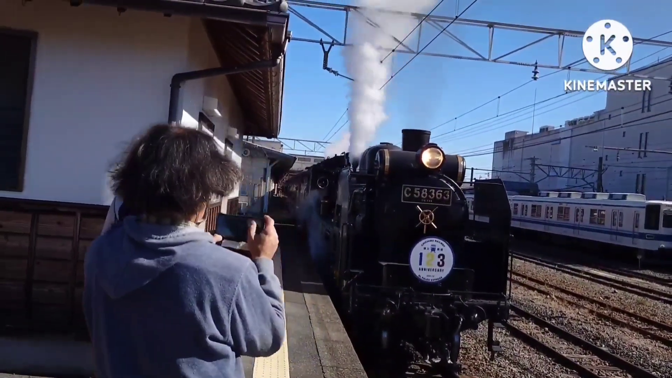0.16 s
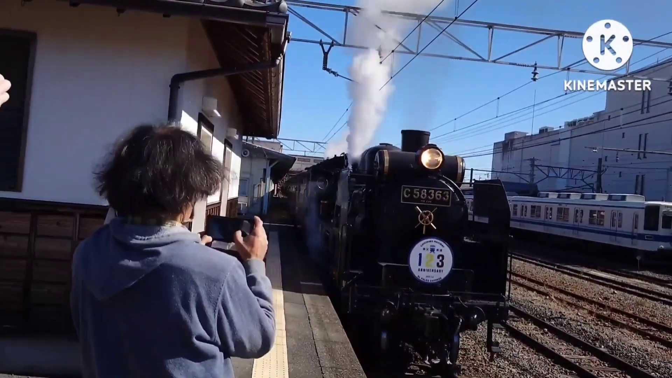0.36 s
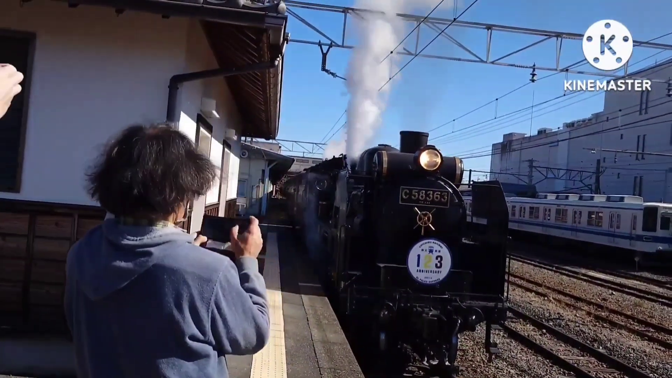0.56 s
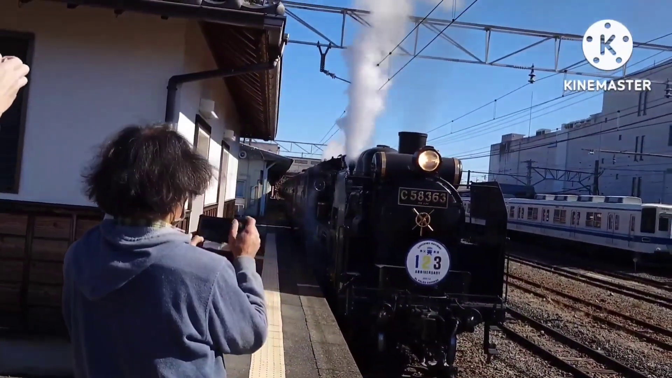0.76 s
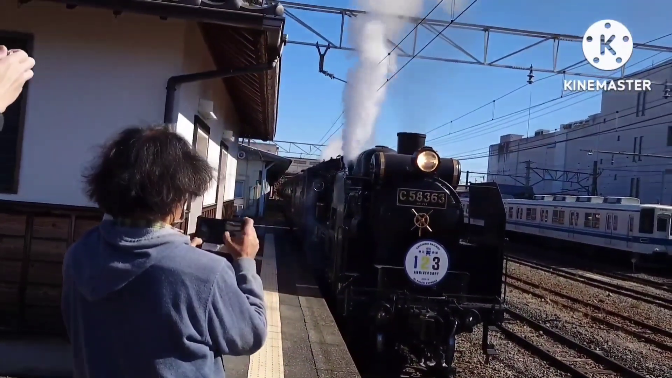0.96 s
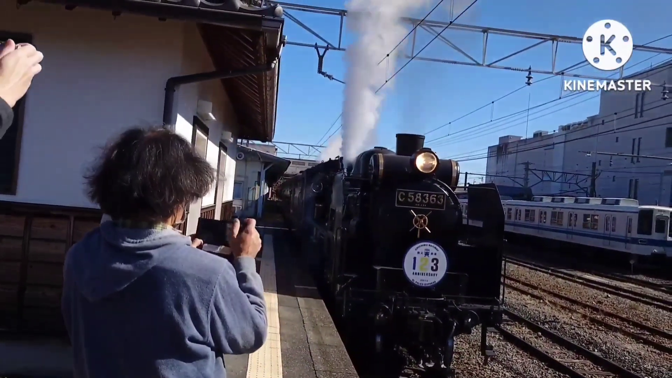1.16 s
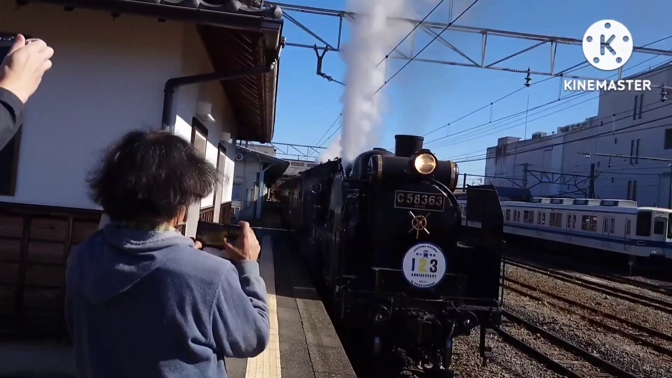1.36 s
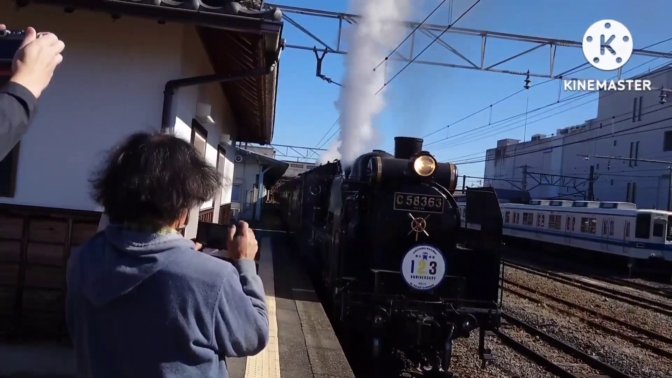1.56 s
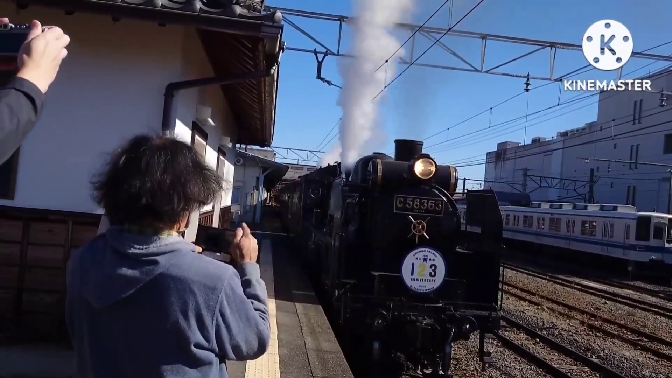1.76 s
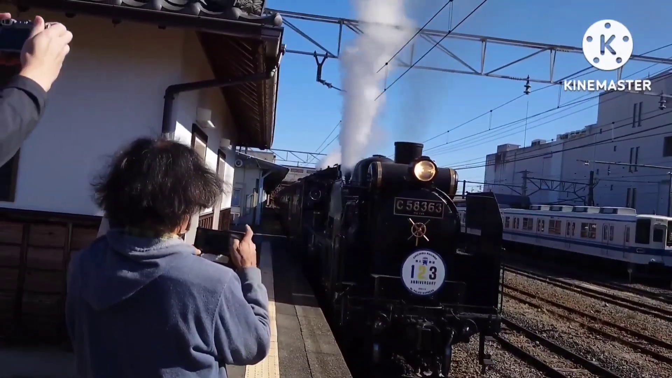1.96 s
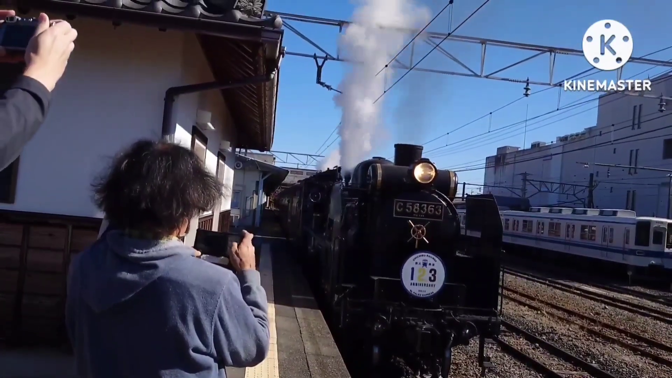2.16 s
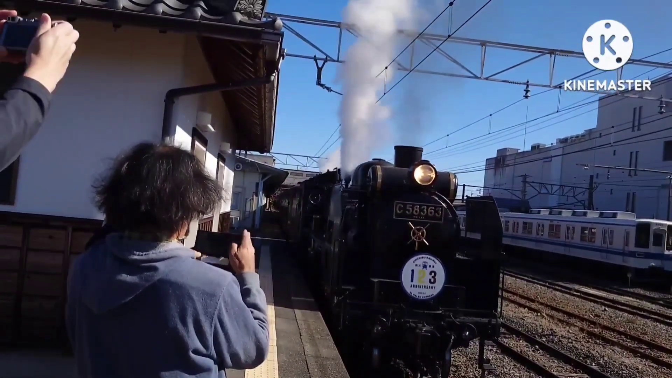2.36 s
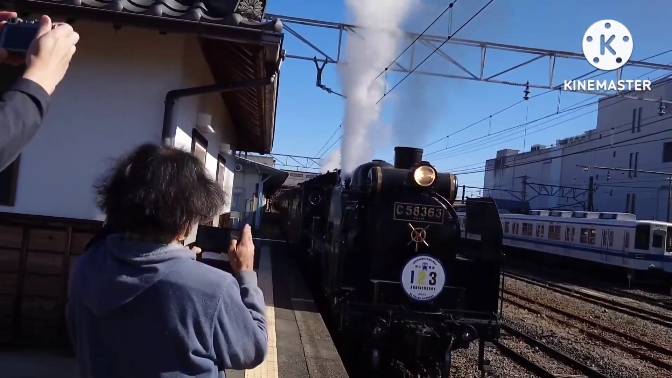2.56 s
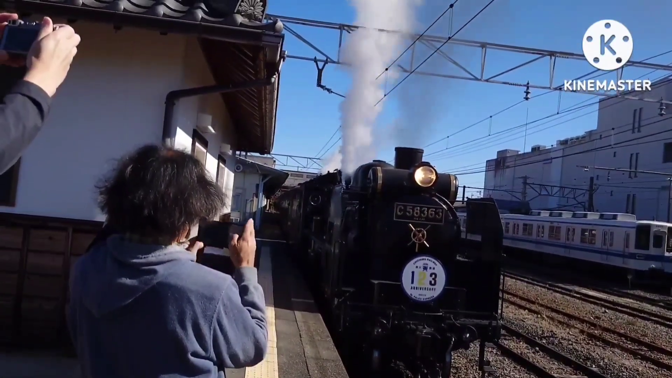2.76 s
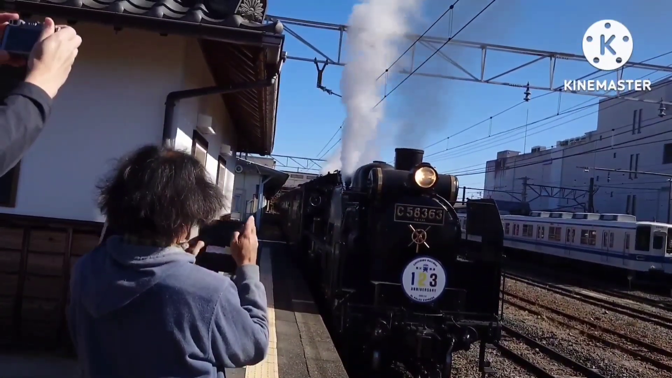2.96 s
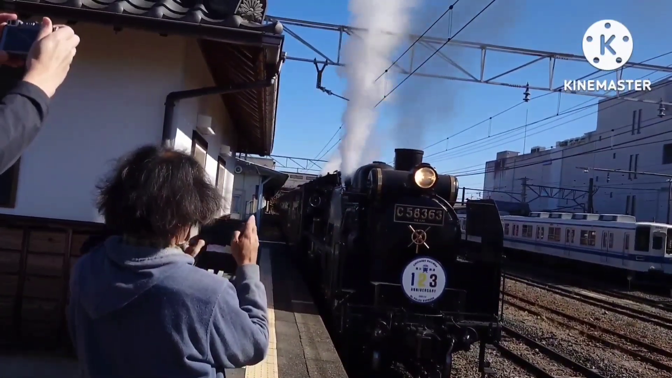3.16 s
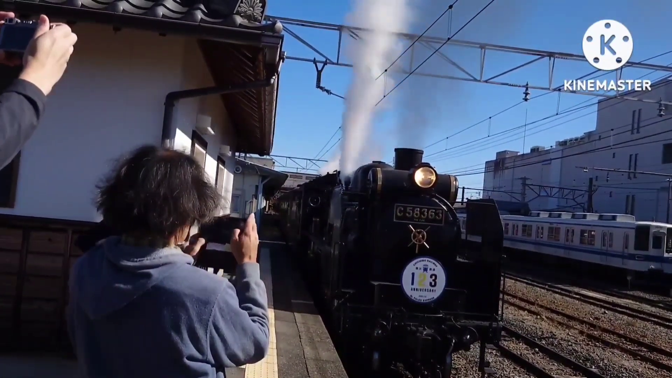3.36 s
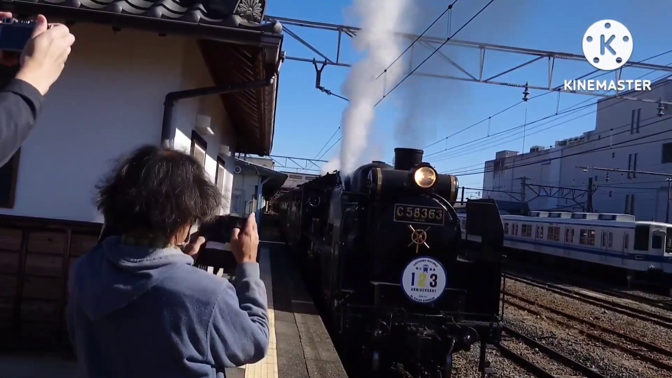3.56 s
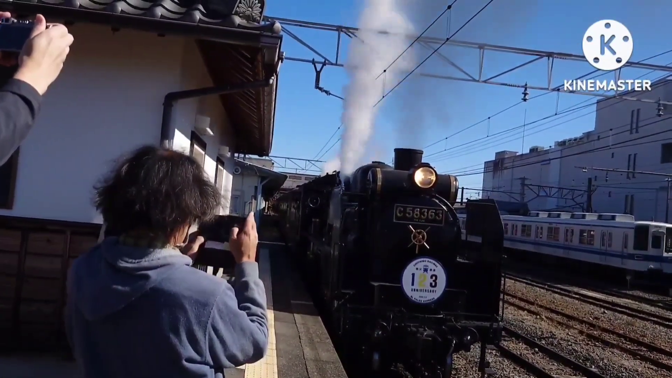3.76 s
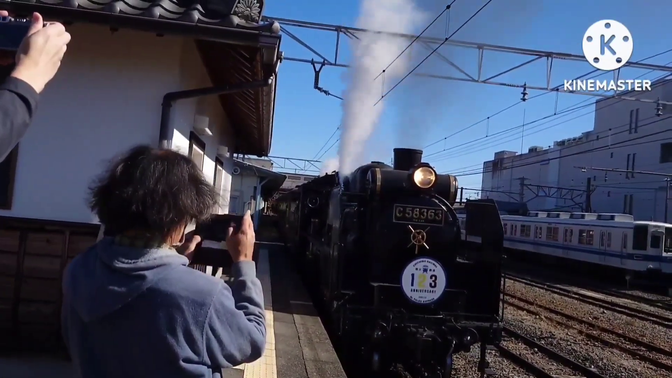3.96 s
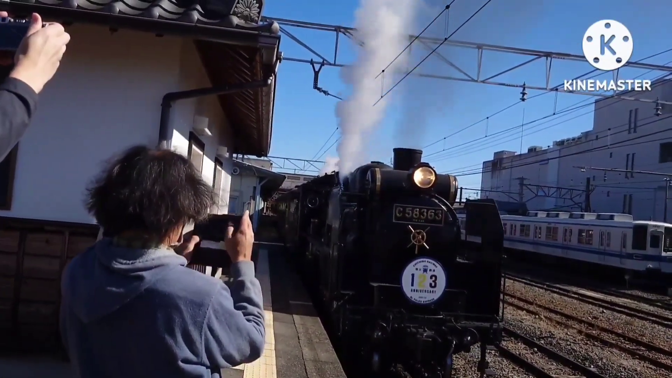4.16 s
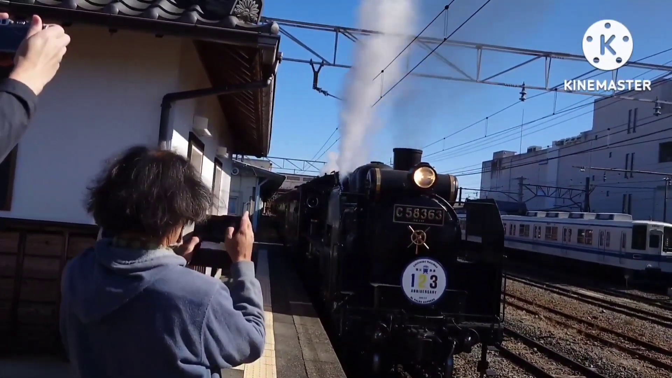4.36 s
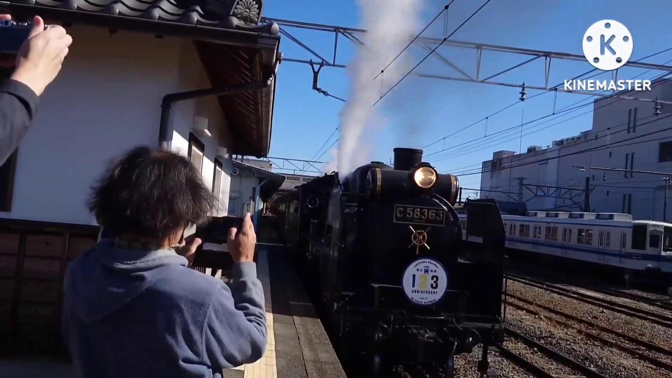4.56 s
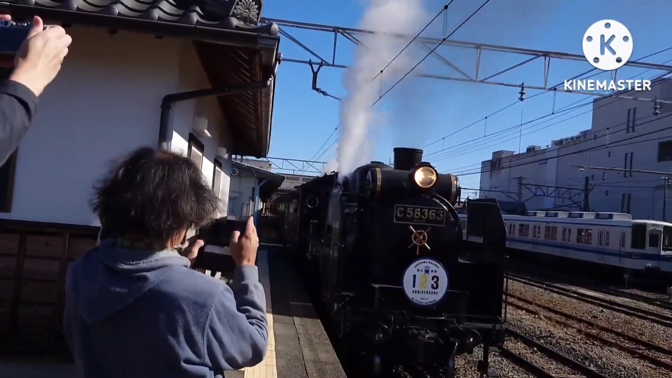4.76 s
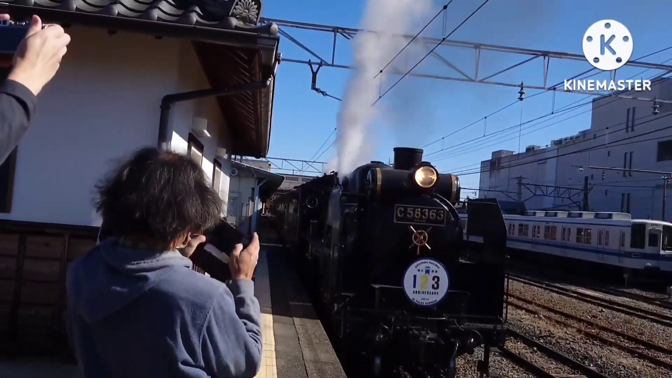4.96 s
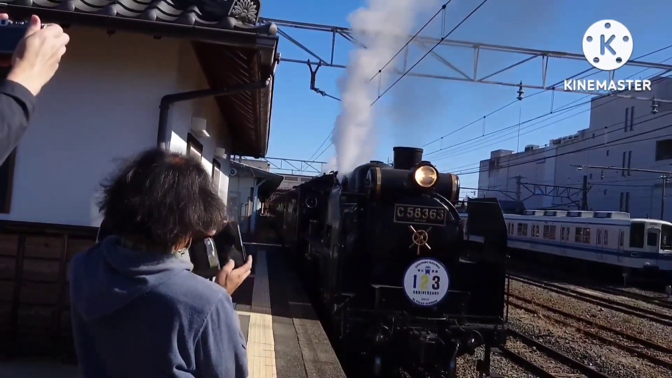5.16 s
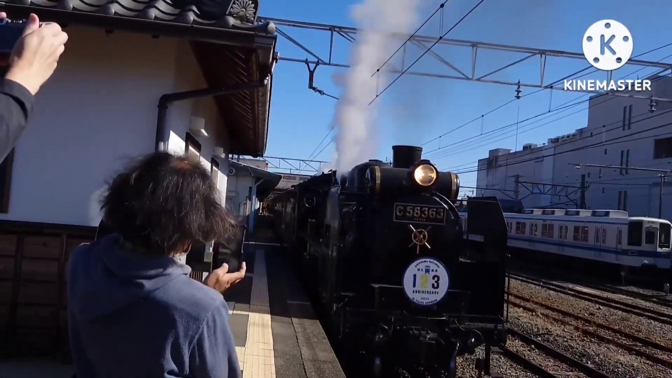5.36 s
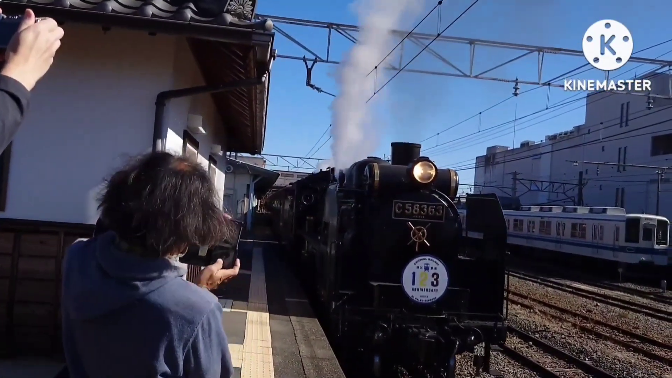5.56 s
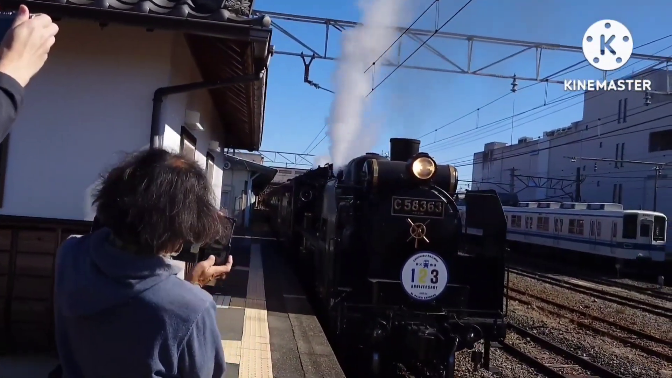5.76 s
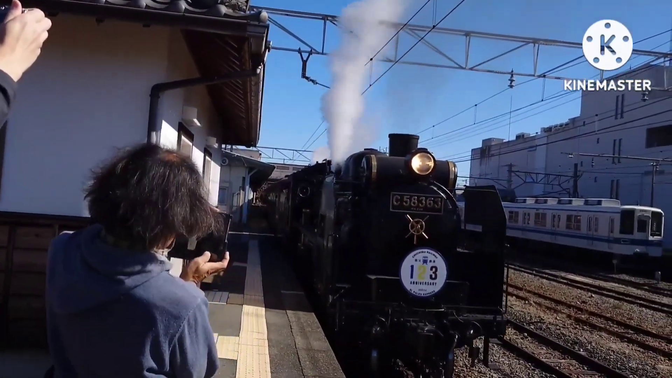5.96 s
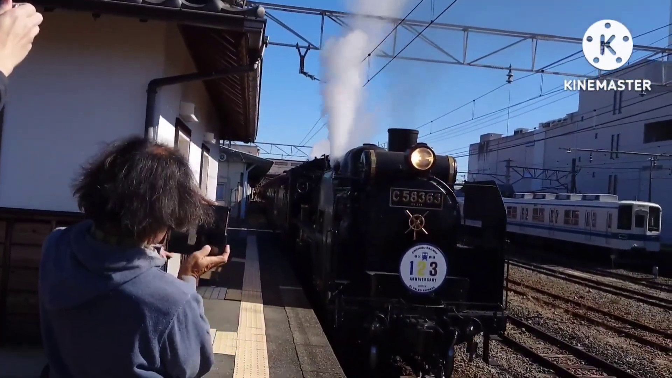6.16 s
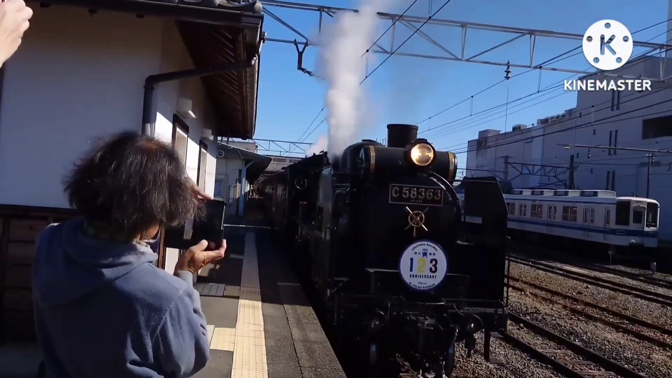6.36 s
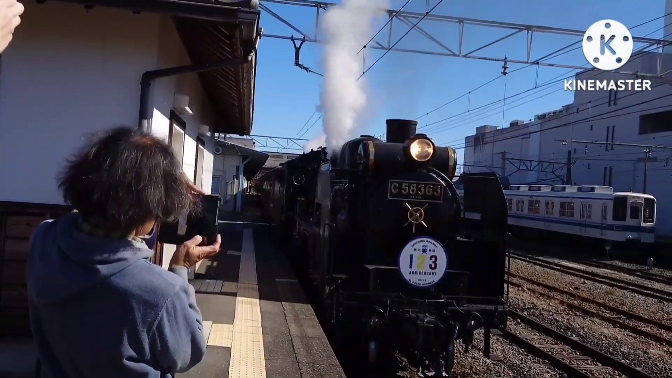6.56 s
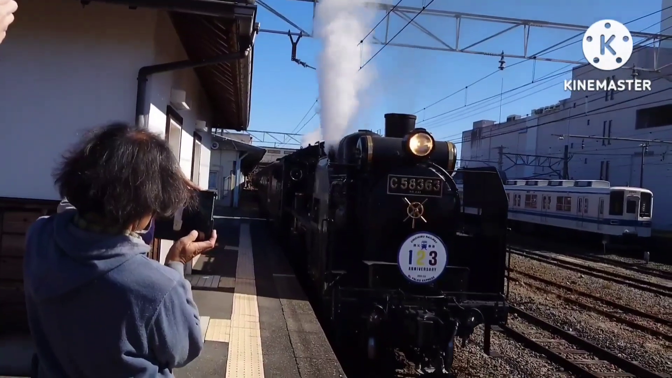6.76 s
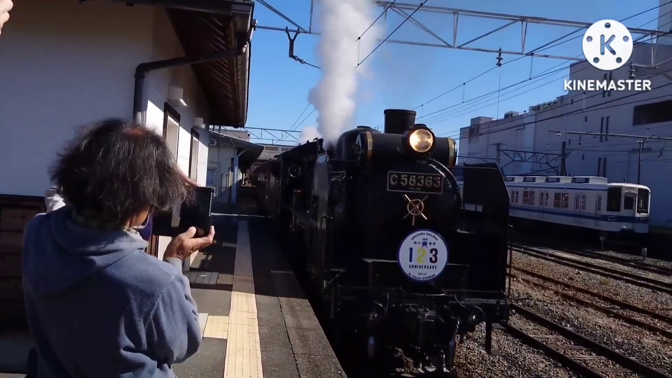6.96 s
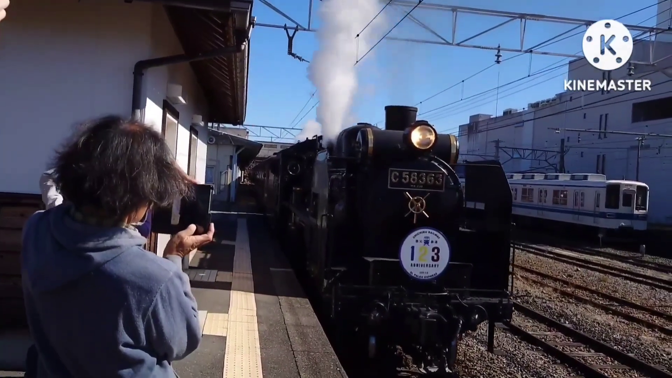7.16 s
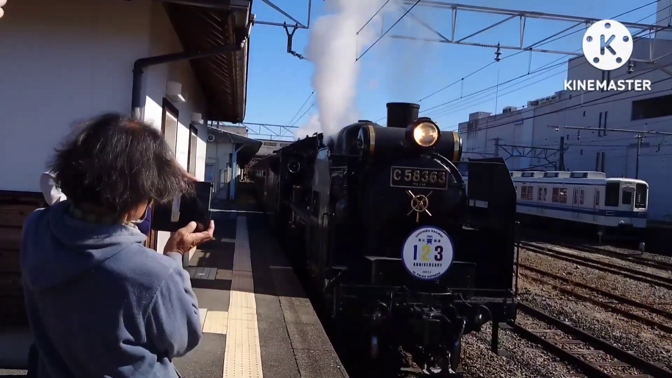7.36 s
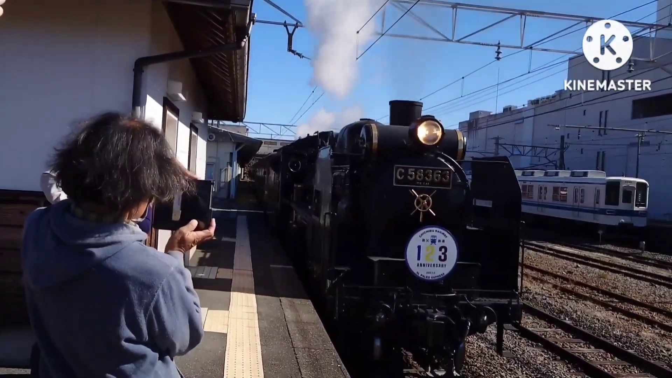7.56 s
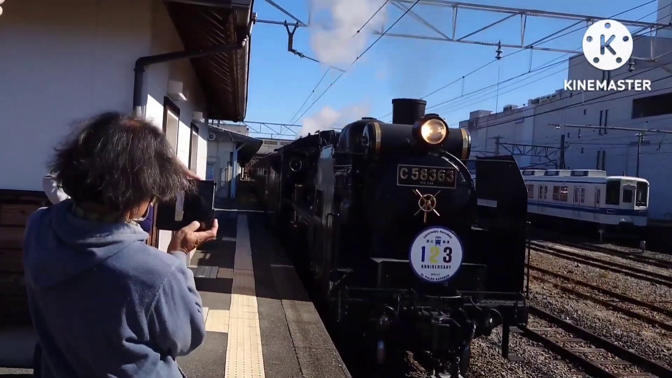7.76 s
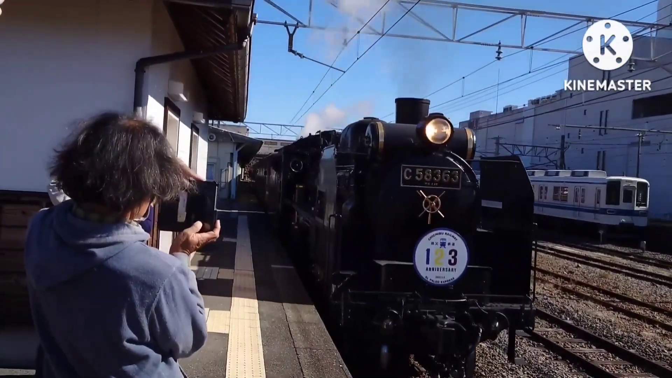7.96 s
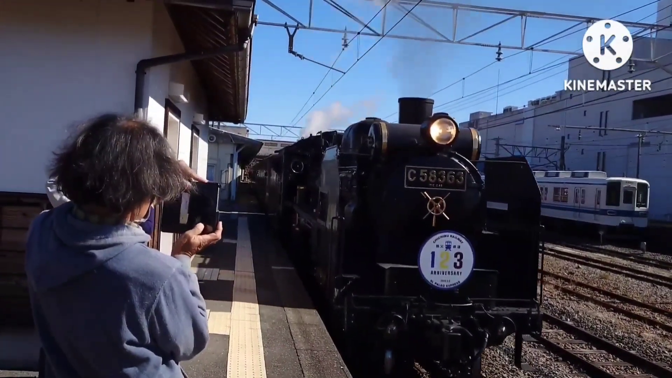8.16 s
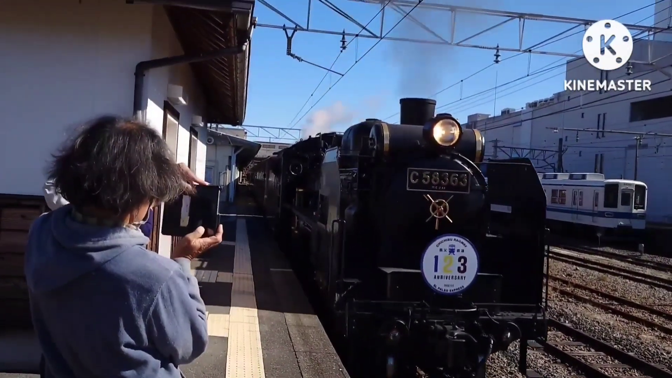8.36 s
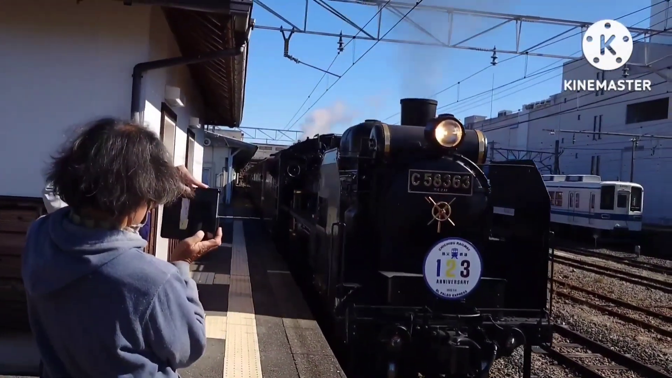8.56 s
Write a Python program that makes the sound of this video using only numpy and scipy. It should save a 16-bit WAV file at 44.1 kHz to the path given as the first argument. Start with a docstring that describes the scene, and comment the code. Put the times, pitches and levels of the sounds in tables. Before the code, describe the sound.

Long multi-toned steam train whistle blast, harsh and breathy, heard close from a platform, ending abruptly with fading echoes and soft steam hiss.

```python
"""Steam whistle at a station

A standing steam locomotive holds one long blast on its five-chime whistle, heard from the platform.
Five jittering tones with harmonics sharpen as the pipes warm, and beat inside the coloured noise of the jet.
When the valve shuts, the chord echoes round the station through slaps and a fading ring.
Shaped noise makes the leaking steam, the boiler rumble and the gusts of wind near the end."""
import sys
import numpy as np
from scipy import signal
from scipy.fft import irfft
from scipy.io import wavfile
from scipy.ndimage import uniform_filter1d, map_coordinates

SR = 44100
rng = np.random.default_rng(int(sys.argv[2]) if len(sys.argv) > 2 else 0)


def unload_wav(signal):
    """Save mono or channel-first audio to the path in sys.argv[1] as 16-bit WAV at rate SR, clipped to [-1, 1]."""
    wavfile.write(
        sys.argv[1],
        SR,
        np.round(np.clip(np.atleast_2d(signal).T, -1, 1) * 32767).astype(np.int16),
    )


N = 379701
TIME = np.arange(N) / SR   # seconds
FREQS = np.maximum(np.fft.rfftfreq(N, 1 / SR), 1)   # Hz
APART = np.array([[.5], [-.5]])   # shares a left-right difference between the two channels


def from_db(db):
    """Turn decibels into gain."""
    return 10 ** (np.asarray(db) / 20)


def rms_one(x):
    """Scale to an average (rms) strength of 1."""
    return x / np.sqrt(np.mean(np.abs(x) ** 2) + 1e-20)


def in_time(rows):
    """Read a table of (time, value) at every sample, with straight lines between its points."""
    times, values = np.transpose(rows)
    return np.interp(TIME, times, values)


def at_hz(points, hz):
    """Read a table of (frequency, value) on a log-frequency axis."""
    points = np.array(points)
    return np.interp(np.log(hz), np.log(points[:, 0]), points[:, 1])


def swell(centre_s, half_s):
    """A smooth bump of height 1."""
    return np.exp(-((TIME - centre_s) / half_s) ** 2)


def drift(rate):
    """Smooth random motion of spread 1 that changes about `rate` times a second."""
    step = 20   # samples between the points of the slow curve
    pole = np.exp(-2 * np.pi * rate * step / SR)
    settle = 2000   # points dropped while the filter settles
    noise = rng.standard_normal(N // step + settle + 2)
    slow = signal.lfilter([1], [1, -2 * pole, pole * pole], noise)[settle:]
    return np.interp(np.arange(N) / step, np.arange(len(slow)), rms_one(slow))


def stereo_noise(colour_db, alike):
    """Two channels of noise with a given spectrum and left-right likeness; rms 1."""
    real = rng.standard_normal((2, len(FREQS)))
    imaginary = rng.standard_normal((2, len(FREQS)))
    mid, side = real + 1j * imaginary
    pair = np.sqrt(1 + alike) * mid + np.sqrt(1 - alike) * side * [[1], [-1]]
    return rms_one(irfft(pair * from_db(colour_db), N))


def rush(phase, width_hz):
    """Turbulence ringing in a resonance: a narrow noise that follows the resonance's pitch."""
    return drift(width_hz) * np.cos(phase) + drift(width_hz) * np.sin(phase)


# The five pipes, lowest first; the third takes its sounding pitch from LEAD_PITCH instead:
# (warm pitch [Hz], flat when cold [%], warming time [s], share of the lead's waver followed [0-1])
PIPES = [(363.4, 4.3, 1.7, 0.248), (448, 3.0, 2.4, .6), (549.4, 4.2, 1.0, 1), (587.9, 3.0, 3.5, .6),
         (724.8, 6.0, 6.0, 0.047)]
# The loud third pipe leads; its pitch wavers with the steam pressure: (time [s], pitch [Hz])
LEAD_PITCH = [(0.0, 526.6), (0.27, 535.2), (1.2, 540.7), (1.33, 545.2), (2.09, 545.8), (2.52, 551.3),
              (2.62, 548.3), (3.94, 545.6), (4.42, 559.5), (4.66, 553), (4.74, 555.6), (5.25, 552.8),
              (6.5, 550.2), (6.62, 539.3), (6.71, 534.7), (7.07, 545.6), (7.24, 540.8), (7.6, 548.4)]
# How strongly the side pipes speak before their slow unsteadiness: (time [s], level [dB])
FIRST_LEVEL = [(0, -34.5), (3.3, -34), (5.7, -22), (7.6, -28.5)]
SECOND_LEVEL = [(0, -26.5), (1.86, -26), (2.06, -33.5), (4.1, -35), (5.9, -25), (6.7, -27), (7.6, -21.5)]
FOURTH_LEVEL = [(0, -22.5), (.55, -31), (.85, -21), (2.1, -38.5), (2.9, -21), (4.1, -54), (4.9, -26.5),
                (6.8, -24.5), (7.6, -30)]
FIFTH_LEVEL = [(0, -22), (.6, -29), (2.6, -31.5), (4.0, -22.5), (4.18, -44), (4.4, -24), (6.7, -26),
               (7.15, -21.5), (7.6, -18)]
# Surges of steam draw the fourth pipe towards the third, into a slow deep throb:
# (time [s], half length [s], pull [Hz], lift [dB])
SURGES = [(2.449, 0.1686, 4.006, 9), (4.407, .19, 11, 14)]
# Own sound of each pipe: (2nd, 3rd and 4th harmonic [dB], pitch jitter [Hz],
# rush at the fundamental [dB], rush at the third mode [dB])
VOICES = [(-57, -45.5, -47.5, 1.11, -51.5, -42), (-38.5, -35, -36, 0.95, -42, -39),
          (-45.5, -41.5, -50, 1.01, -33, -45), (-43, -52, -71, 1.587, -59, -35),
          (-50.5, -63, -80, 2.62, -32.5, -52.5)]
# The second pipe's octave swells and falls back: (time [s], lift [dB])
OCTAVE = [(0, 0.5), (3.1, 2), (3.6, 4), (6.35, 5.5), (6.6, -0.5), (7.6, -2)]


def chime(sag_percent, hollow):
    """The five pipes, one stereo pair each; the third and fourth share steam and throb at their beat rate."""
    lead, neighbour = 2, 3   # third and fourth pipe, counted from 0
    lead_db, start_db, settle_s, fade_db_per_s = -12.5, -3.5, 1, 0.18
    swell_db, waver_percent, unrest_per_s = 1.77, 0.2014, 2.154   # unsteadiness of the side pipes
    throb_depth = .25   # share of the lead's tone that swings at the beat rate

    hz = np.array([warm_hz * warming(flat, seconds) for warm_hz, flat, seconds, _ in PIPES])
    lead_hz = in_time(LEAD_PITCH)
    waver = lead_hz / hz[lead] - 1
    level_db = np.zeros_like(hz)
    hz[lead] = lead_hz
    level_db[lead] = lead_db + start_db * np.exp(-TIME / settle_s) - fade_db_per_s * TIME

    side_levels = {0: FIRST_LEVEL, 1: SECOND_LEVEL, 3: FOURTH_LEVEL, 4: FIFTH_LEVEL}
    for k, curve in side_levels.items():
        followed = PIPES[k][-1] * waver
        hz[k] *= 1 + followed + waver_percent / 100 * drift(unrest_per_s)
        level_db[k] = in_time(curve) + swell_db * drift(unrest_per_s)
    for centre_s, half_s, pull_hz, lift_db in SURGES:
        hz[neighbour] -= pull_hz * swell(centre_s, half_s)
        level_db[neighbour] += lift_db * swell(centre_s, half_s)

    phase = 2 * np.pi * np.cumsum(hz * (1 - sag_percent / 100), axis=1) / SR
    level = from_db(level_db)
    level[lead] *= 1 + throb_depth * np.cos(phase[neighbour] - phase[lead])
    level[[lead, neighbour]] *= 1 - hollow
    voices = [list(voice) for voice in VOICES]
    voices[1][0] += in_time(OCTAVE)
    return [pipe(*parts) for parts in zip(phase, level, voices)]


def warming(flat_percent, warming_s):
    """A pipe's pitch as a share of its warm pitch: it starts flat and sharpens with the heat."""
    return 1 - flat_percent / 100 * np.exp(-TIME / warming_s)


# Deepest hollows of the third and fourth pipes' beat: (time [s], half length [s], depth [0-1])
NULLS = [(4.283, 0.011, 0.3), (4.388, 0.016, 0.87), (4.463, 0.0091, 0.7)]


def beat_nulls():
    """How far the third and fourth pipes' sound sinks in the deepest beats, at set times."""
    dips = sum(depth * swell(centre_s, half_s) for centre_s, half_s, depth in NULLS)
    return np.clip(dips, 0, 1)


def pipe(centre, level, voice, flutter_db=0.32, overtone_flutter_db=3.0, overtone_spread=0.98, tone_spread=0.33):
    """One stopped pipe: a jittering tone, its harmonics, and turbulence in its first and third modes."""
    *harmonics_db, jitter_hz, first_db, third_db = voice
    phase = centre + wander(jitter_hz)
    # reflections beside the listener shift the tone's phase between the ears
    aside = tone_spread * drift(rate=0.83) * APART
    tone = np.sqrt(2) * level * from_db(flutter_db * drift(rate=87)) * np.sin(phase + aside)
    out = tone + from_db(first_db) * rush(centre, width_hz=35.2)
    for k, db in enumerate(harmonics_db, 2):
        # the shorter waves reach the two ears with a wandering phase difference
        skew = overtone_spread * drift(rate=2.14) * APART
        overtone_level = from_db(db + overtone_flutter_db * drift(rate=6.4))
        out += np.sqrt(2) * overtone_level * np.sin(k * phase + skew)
    third = 3 * centre
    middle = rush(third, width_hz=96)
    sides = 0.53 * rush(third, width_hz=70) * [[1], [-1]]
    return out + from_db(third_db) * (middle + sides)


def wander(jitter_hz):
    """Phase that a pipe gains and loses as the steam pushes its pitch about."""
    return 2 * np.pi * np.cumsum(jitter_hz * drift(rate=16.45)) / SR


def combination_tones(chord, steepening=0.042):
    """So loud a wave steepens, which adds the sums and differences of the pitches."""
    high_pass = signal.butter(2, 70, "high", fs=SR, output="sos")
    return steepening * signal.sosfilt(high_pass, chord ** 2)


# Strength of the hiss before a fixed lift: (time [s], level [dB])
JET_LEVEL = [(0.0, -24), (0.1, -22.5), (1.8, -24), (2.2, -27.5), (2.54, -20.5), (2.73, -27), (3.22, -26.5),
             (3.34, -25.5), (3.66, -28), (4.27, -25.5), (4.47, -21), (5.1, -23), (6.29, -22), (7.17, -24),
             (7.2, -22), (7.6, -21.5)]
# Spectrum of the escaping steam: (frequency [Hz], relative level [dB per Hz])
JET_COLOUR = [(900, -21.5), (1400, 1.5), (1850, -6), (2020, -9.5), (2650, -2), (3000, 1), (4300, 0.5),
              (5600, 0), (6500, -2.5), (8300, 1), (9500, -1.5), (11000, -1), (13000, -4.5), (15500, -4)]
# Balance of the hiss between the ears: (frequency [Hz], left minus right [dB])
HISS_BALANCE = [(1000, 3.5), (2000, 3), (5000, -1.5), (9000, 1.3), (14000, 2)]
# Likeness of the two channels before the reflections: (frequency [Hz], likeness [0-1])
LIKENESS = [(60, 0.92), (120, 0.28), (240, 1), (480, 0.77), (950, 0.32), (1890, 0.16), (3770, 0.66),
            (7520, 0.32), (15000, 0.27)]
# High modes of the whistle bell, sung by the jet:
# (frequency [Hz], width [Hz], level relative to the hiss [dB])
BELL = [(2194, 170, -20), (3222, 150, -20.5), (4614, 110, -21), (5013, 100, -13), (5570, 100, -17.5),
        (7720, 190, -19), (8440, 220, -16.5)]


def jet(hiss_db=3.0, bright_hz=9000, top_db=1.1):
    """Escaping steam hisses through the bell's resonances and surges with the pressure."""
    brightens = 0.083   # extra dB above bright_hz per dB of hiss
    level_db = in_time(JET_LEVEL)
    balance = at_hz(HISS_BALANCE, FREQS) * APART
    hiss = stereo_noise(at_hz(JET_COLOUR, FREQS) + balance, alike=at_hz(LIKENESS, FREQS))
    hiss = swaying_paths(hiss, reflection=0.64, sway=0.0302)
    high_pass = signal.butter(2, bright_hz, "high", fs=SR, output="sos")
    top = signal.sosfiltfilt(high_pass, hiss)
    top_gain = from_db(top_db + brightens * (level_db - level_db.mean()))
    hiss = hiss + (top_gain - 1) * top
    singing = sum(bell_mode(*mode) for mode in BELL)
    return from_db(level_db + hiss_db) * (hiss + singing)


def swaying_paths(x, reflection, sway):
    """Short reflections off boiler and roof, whose lengths drift as the plume sways, comb the hiss."""
    out = x.copy()
    for channel in (0, 1):
        for lag_s in rng.uniform(.0015, .009, 4):
            # position in the sound, in samples, that arrives late at each moment
            behind = np.arange(N) - lag_s * SR * (1 + sway * drift(rate=0.537))
            out[channel] += reflection * map_coordinates(x[channel], [behind], order=3, mode="mirror")
    return rms_one(out)


def bell_mode(hz, width_hz, db, swell_db=3, glide=.01):
    """A breathy whistling band that wanders in pitch and comes and goes."""
    phase = 2 * np.pi * np.cumsum(hz * (1 + glide * drift(rate=.8))) / SR
    band = rush(phase, width_hz) + 0.5 * rush(phase, width_hz) * np.array([[1], [-1]])
    return from_db(db + swell_db * drift(rate=1.1)) * rms_one(band)


# Spectrum of the roar at the pipe mouths: (frequency [Hz], relative level [dB per Hz])
MOUTH_COLOUR = [(200, -45), (300, -45), (400, -10.5), (470, -19), (510, -4), (620, 6.5), (690, -1),
                (740, -5), (800, -6.5), (860, -12), (1000, -20.5), (1500, -62)]


def mouth_roar(level_db=-26):
    """Turbulent steam at the pipe mouths makes a low, coloured noise."""
    return from_db(level_db) * stereo_noise(at_hz(MOUTH_COLOUR, FREQS), alike=0.5)


def valve():
    """Opening in dB, widening until it snaps shut, and the pitch sag in % once the steam is cut."""
    opening_db_per_s, shut_s, shut_db_per_s = 0.45, 7.615, 323
    sag_percent, sag_s = 5.4, 0.028
    shut_for = np.maximum(TIME - shut_s, 0)
    opening_db = opening_db_per_s * TIME - shut_db_per_s * shut_for
    return opening_db, sag_percent * (1 - np.exp(-shut_for / sag_s))


# Echoes off the buildings, before the walls dull them: (delay [s], level [dB])
ECHOES = [(.125, -27.5), (.215, -29), (.39, -25.5), (.72, -36), (1.1, -39)]
# Ring of the station yard: (frequency [Hz], time to die by 60 dB [s])
YARD_RING = [(300, 3.3), (700, 1.795), (1600, 3.15), (3000, 1.2), (8000, .4), (15000, .2)]


def station(x, wet_db=-16, wall_hz=2500, spread_s=0.046):
    """Dull slaps from the buildings and a diffuse ring whose treble dies first."""
    t = TIME[:2 * SR]
    response = np.zeros((2, len(t)))
    # late reflections arrive from all sides
    width = (1 - np.exp(-t / spread_s)) * [[1], [-1]]
    edges = np.geomspace(200, 15000, 8)
    for low, high in zip(edges, edges[1:]):
        band = signal.butter(2, [low, high], "band", fs=SR, output="sos")
        mid, side = signal.sosfilt(band, rng.standard_normal((2, len(t))))
        ring_s = at_hz(YARD_RING, np.sqrt(low * high))
        response += (mid + width * side) * from_db(-60 * t / ring_s)
    onset = 1 - np.exp(-t / 0.027)   # the ring builds up over some hundredths of a second
    response *= from_db(wet_db) * onset / np.sqrt(.1 * SR)
    for delay_s, db in ECHOES:
        response[:, int(delay_s * SR)] += from_db(db)
    response = signal.sosfilt(signal.butter(2, wall_hz, fs=SR, output="sos"), response)
    return signal.fftconvolve(x, response, axes=1)[:, :N]


# Spectrum of the leaking steam: (frequency [Hz], relative level [dB per Hz])
LEAK_COLOUR = [(150, -11), (400, 6), (1400, 2.5), (2200, -0.5), (5000, 0.5), (9000, -0.5), (15500, -1)]


def leaking_steam(level_db=-35):
    """Steam seeping from the engine is a steady, wide hiss."""
    return from_db(level_db) * stereo_noise(at_hz(LEAK_COLOUR, FREQS), alike=0.047)


# Spectrum of the boiler: (frequency [Hz], relative level [dB per Hz])
RUMBLE_COLOUR = [(15, 8), (30, 7), (45, 1.5), (95, 1.5), (130, -10.5), (220, -10.5), (300, -27), (600, -39)]


def boiler_rumble(level_db=-47):
    """The boiler gives a steady noise of low frequencies."""
    return from_db(level_db) * stereo_noise(at_hz(RUMBLE_COLOUR, FREQS), alike=0.74)


# Spectrum of the wind: (frequency [Hz], relative level [dB per Hz])
WIND_COLOUR = [(15, -12), (35, 3), (70, -5), (130, -16), (185, -5), (260, -34), (500, -45)]
# Gusts on the microphone, before the lumps: (time [s], peak level [dB])
GUSTS = [(7.2, -31), (7.3, -26), (7.49, -40), (8.6, -40)]


def wind():
    """Lumpy gusts on the microphone rise fast and die more slowly."""
    rise_db_per_s, fall_db_per_s = 230, 97
    gusts = np.zeros(N)
    for peak_s, db in GUSTS:
        below_peak_db = np.maximum(rise_db_per_s * (peak_s - TIME), fall_db_per_s * (TIME - peak_s))
        gusts += from_db(db - below_peak_db)
    lumps_db = 2 * drift(rate=14)
    return gusts * from_db(lumps_db) * stereo_noise(at_hz(WIND_COLOUR, FREQS), alike=0.91)


def scene(beamed=0.39, stand_out_db=4):
    """The valve feeds pipes, mouth roar and jet; the station answers."""
    valve_db, sag_percent = valve()
    opening = from_db(valve_db)
    hollow = beat_nulls()
    pipes = chime(sag_percent, hollow)
    chord = sum(pipes)
    # the hiss and roar stand out for a moment in the hollows of the beat
    noise = from_db(stand_out_db * hollow) * (mouth_roar() + jet())
    whistle = opening * (chord + combination_tones(chord) + noise)
    # the loudest pipe faces the platform, so less of it goes out into the yard
    echo = station(whistle - beamed * opening * pipes[2])
    # moving air on the long paths makes the echo flutter
    flutter = from_db(1.6 * drift(rate=12))
    return whistle + flutter * echo + leaking_steam() + boiler_rumble() + wind()


def record(dry, knee_db=-18.5, makeup_db=5.0, squeeze=0.81, cutoff_hz=15550):
    """Gain control holds the blast down and lets the echoes up; the top is cut."""
    power = uniform_filter1d(np.mean(dry ** 2, axis=0), size=SR // 6)
    over_db = np.maximum(10 * np.log10(np.abs(power) + 1e-12) - knee_db, 0)
    held = dry * from_db(makeup_db - squeeze * over_db)
    low_pass = signal.ellip(12, .1, 80, cutoff_hz, fs=SR, output="sos")
    return signal.sosfilt(low_pass, held)


dry = scene()
out = record(dry)
unload_wav(out)
```